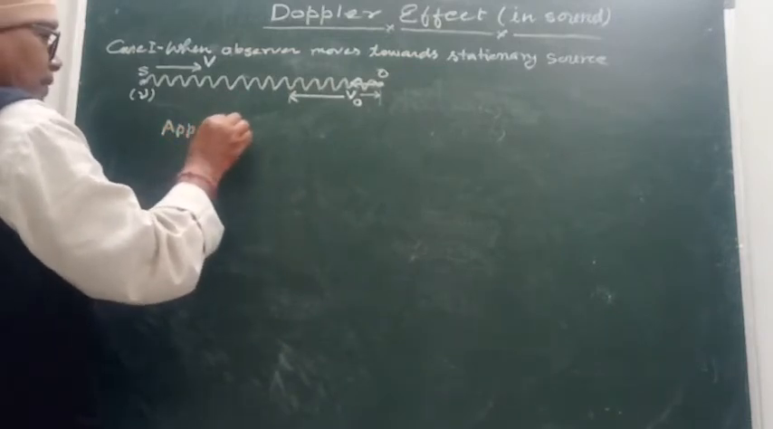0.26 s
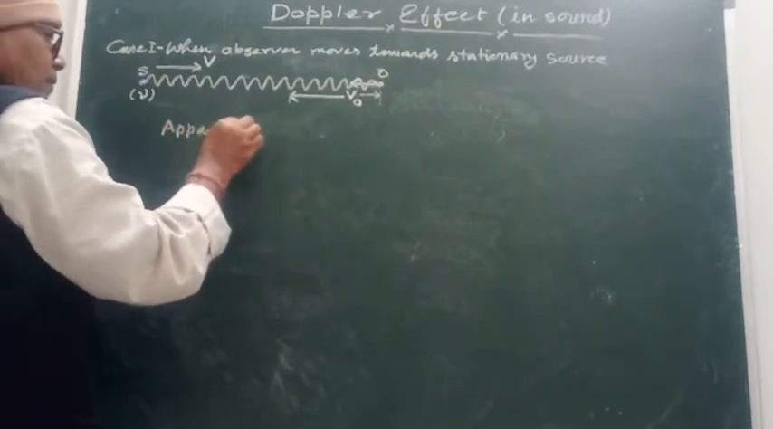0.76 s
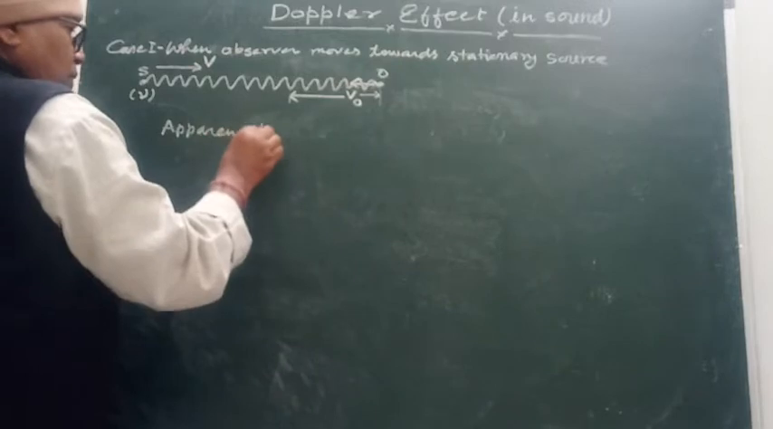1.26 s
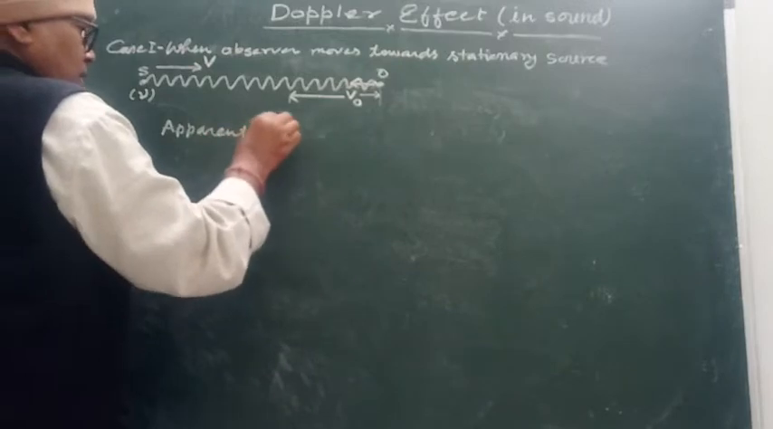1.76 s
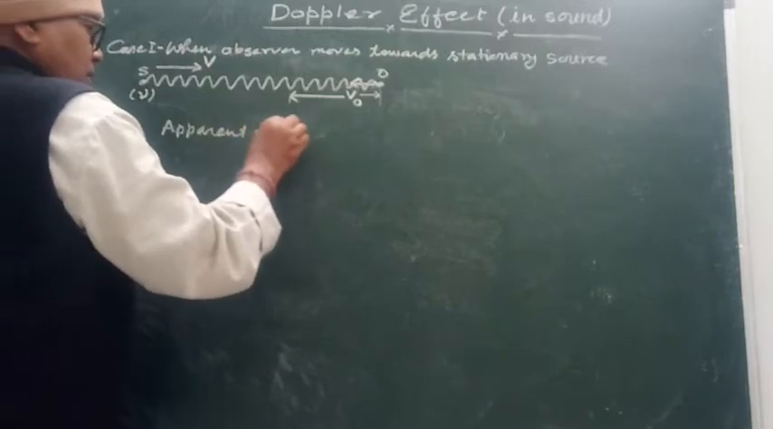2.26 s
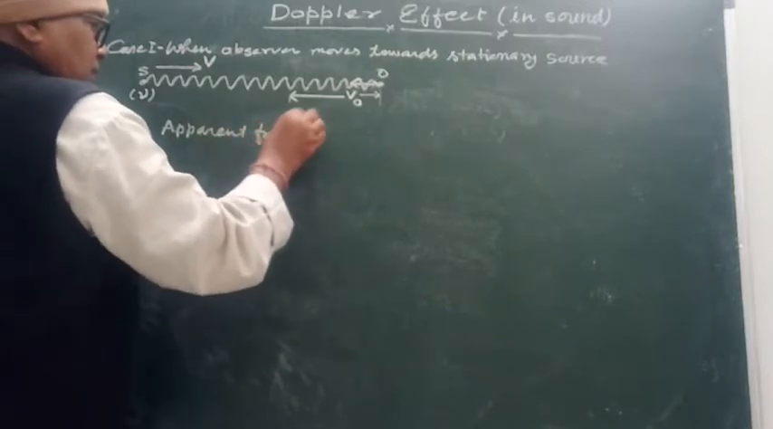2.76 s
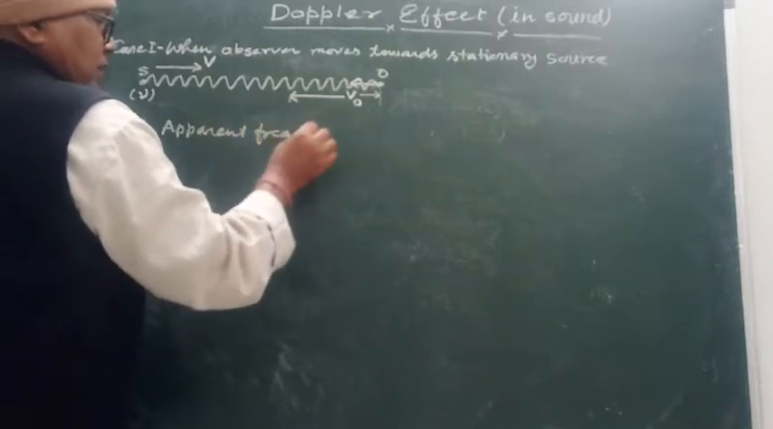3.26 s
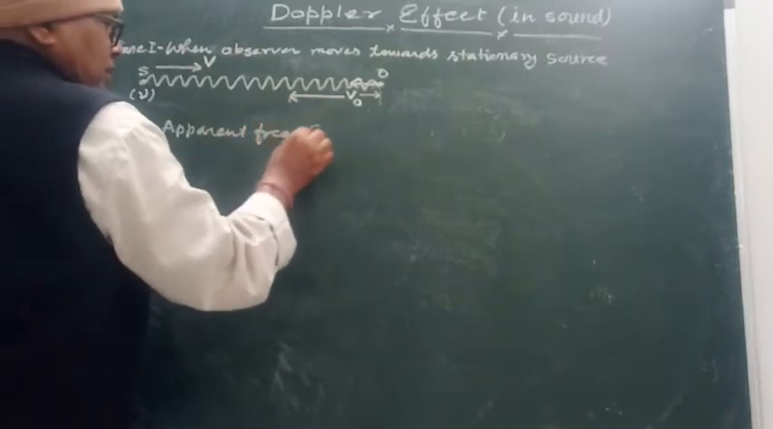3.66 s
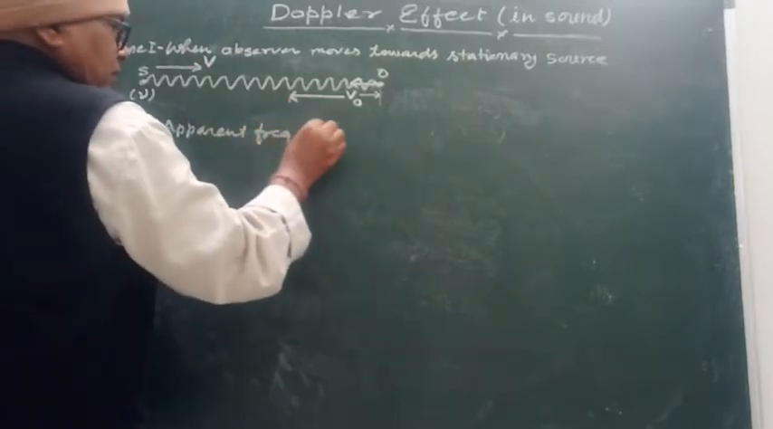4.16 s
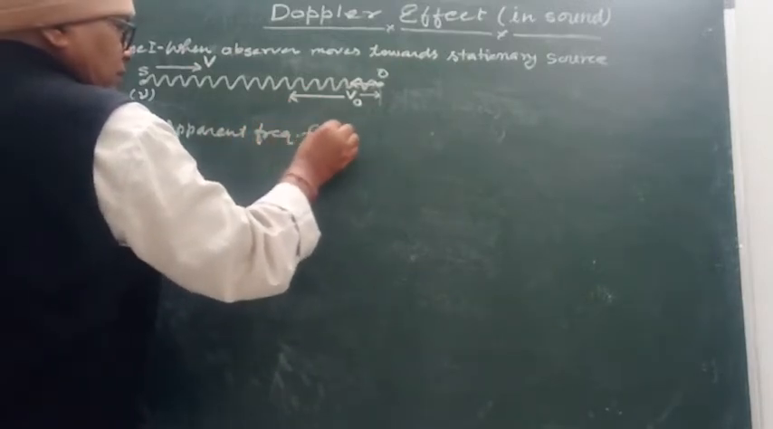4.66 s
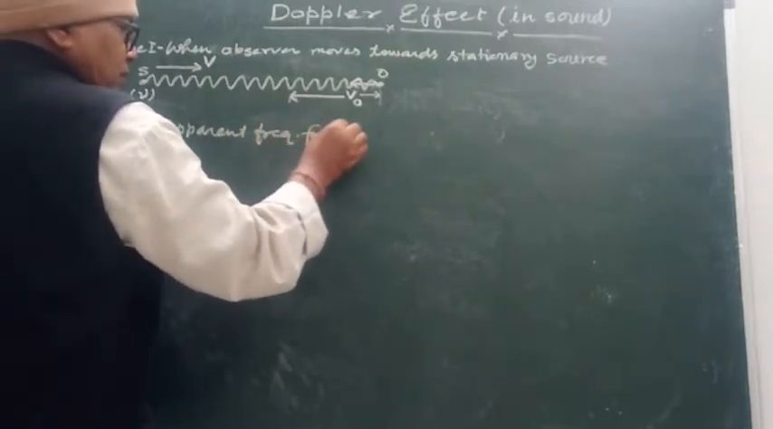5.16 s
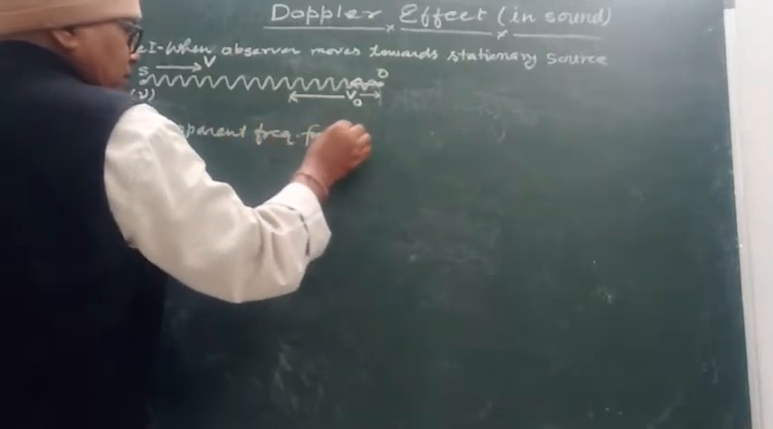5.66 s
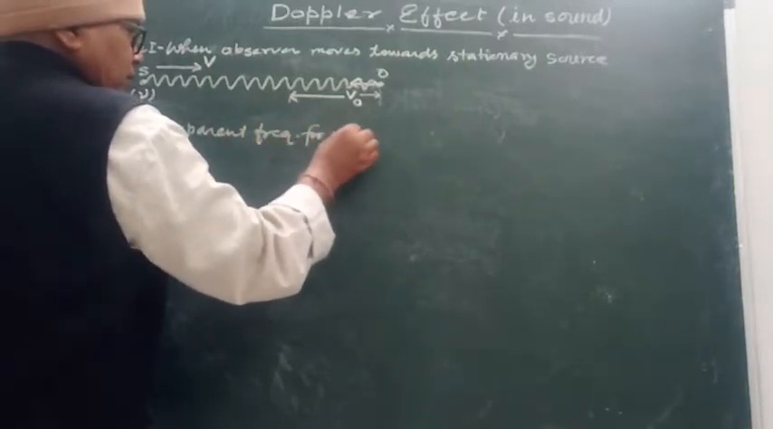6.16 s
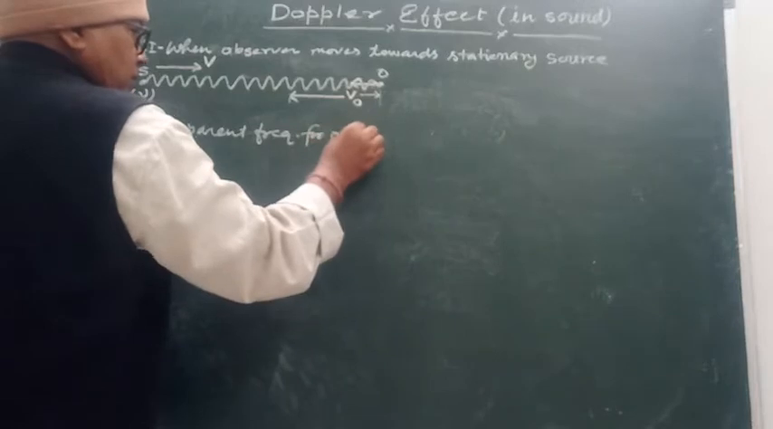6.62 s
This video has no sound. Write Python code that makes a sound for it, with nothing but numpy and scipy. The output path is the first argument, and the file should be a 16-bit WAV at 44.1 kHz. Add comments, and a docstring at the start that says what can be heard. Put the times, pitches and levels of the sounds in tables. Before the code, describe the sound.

Irregular sharp chalk knocks and short gritty strokes on a large wall board, with hollow room reverberation and a very quiet background.

```python
"""Taps and short scratches of chalk writing a few words on a wall blackboard in a bare, echoing classroom.
Each contact rings the board's modes and the chalk stick, runs back from the panel's edges and swings the panel.
Each drag is a train of crumbling grains: they hiss, rasp in the board's modes and sustain its resonances.
One crumb cracks with a tiny tick. Filtered noise makes the still air, a wavering sine the faint hum."""
import sys
import numpy as np
from scipy import signal
from scipy.fft import rfft, irfft, next_fast_len
from scipy.io import wavfile
from scipy.ndimage import uniform_filter1d

SR = 44100
rng = np.random.default_rng(int(sys.argv[2]) if len(sys.argv) > 2 else 0)


def wav_record(signal):
    """Record a signal, one row per channel, as 16-bit PCM in the file named by sys.argv[1]."""
    frames = np.transpose(np.atleast_2d(signal))
    bounded = np.clip(frames, -1, 1)
    # unit amplitude maps onto the largest positive 16-bit level
    quanta = np.round(bounded * 32767).astype(np.int16)
    wavfile.write(sys.argv[1], SR, quanta)


N = 303893
TIME_S = np.arange(N) / SR

# Chalk drags. Each row: start in seconds, length in seconds, share spent gathering speed (0-1), hiss of the tip
# in dB, rasp of its bite in dB before trim, panel drone in dB, pitch of the bite in Hz, pitch of the stick in Hz.
STROKES = [(-0.01, 0.17, 0.81, -48, -40.5, -46, 2000, 8250), (0.186, 0.098, 0.6, -53, -51, -52, 2470, 9000),
           (0.312, 0.082, 0.65, -53, -45, -49, 2000, 5950),
           (0.445, 0.16, 0.64, -51, -46, -48.5, 2050, 5800),
           (0.555, 0.095, 0.64, -47, -32, -40.5, 1150, 5940),
           (0.68, 0.16, 0.43, -48, -47, -46.5, 2600, 8800),
           (0.947, 0.04, .55, -45.5, -39.5, -39, 1870, 6300), (1.183, 0.17, 0.3, -46, -43, -37, 2300, 7760),
           (1.369, 0.11, 0.51, -46.5, -34.5, -33.5, 1070, 5900),
           (1.485, 0.18, 0.43, -47, -42.5, -42.5, 1000, 7300),
           (1.70, 0.15, 0.63, -46.5, -41.5, -45.5, 2210, 8300),
           (1.9, 0.19, 0.35, -55, -56, -46, 2420, 8260),
           (2.031, 0.15, 0.49, -46.5, -42.5, -45.5, 2200, 6950),
           (2.174, 0.14, 0.65, -50, -46.5, -38, 2470, 8900),
           (2.329, 0.083, 0.42, -47.5, -44.5, -42.5, 2540, 7200),
           (2.437, 0.15, 0.37, -48.5, -48.5, -42, 810, 8200),
           (2.588, 0.045, 0.84, -45, -42.5, -42.5, 1930, 6400),
           (2.78, 0.038, 0.54, -50, -34.5, -49, 2220, 5500),
           (3.542, 0.22, 0.64, -47, -50, -44.5, 1810, 8000),
           (3.862, 0.11, 0.35, -46.5, -42, -42, 845, 6060), (3.987, 0.14, 0.47, -56.5, -55, -48, 862, 7500),
           (4.13, 0.094, 0.49, -54.5, -44, -41, 1250, 5960),
           (4.217, 0.11, 0.46, -53, -50, -42.5, 850, 6060), (4.336, 0.073, 0.4, -60, -49.5, -40, 850, 6100),
           (4.389, 0.079, 0.92, -52.5, -44.5, -41.5, 2670, 5760),
           (4.68, 0.21, 0.32, -53, -52, -41.5, 870, 7000), (4.854, .15, 0.72, -51, -42, -44.5, 1460, 6900),
           (5.174, .14, .58, -50.5, -47, -43, 3070, 7050), (5.328, 0.023, 0.7, -54, -45, -47, 1830, 7150),
           (5.687, 0.12, 0.26, -61.5, -51, -48.5, 2940, 5700),
           (5.767, 0.11, 1, -52, -51.5, -46.5, 2500, 6950), (5.873, 0.077, 0.56, -59, -46, -42, 1990, 7800),
           (6.043, 0.072, 0.37, -54.5, -47, -38, 3000, 7050),
           (6.115, 0.12, 0.4, -55, -48.5, -44, 840, 7000),
           (6.228, 0.081, 0.58, -57.5, -49, -44.5, 2770, 6920),
           (6.448, 0.15, 0.8, -62, -51, -42.5, 2690, 6650),
           (6.566, 0.14, 0.65, -58.5, -50, -43.5, 830, 6910),
           (6.686, 0.19, 0.48, -54.5, -49, -41.5, 846, 6560),
           (6.756, 0.099, 0.68, -61, -42.5, -43, 1500, 6460)]
# Chalk contacts: taps, soft bumps and lift-off flicks. Each row: start in seconds, blow in dB, contact cut-off
# in Hz, low modes at that spot in dB, tick of the tip in dB, panel thump in dB before trim.
CONTACTS = [(0.927, 6, 3260, 2.5, -12, -37), (1.0938, -5, 1270, 1, -34, -38.5),
            (1.1624, 8.5, 2970, -3.5, -19.5, -33.5), (1.837, -11.5, 3000, -14, -14, -70),
            (2.627, -11.5, 2090, -5, -25, -63), (2.716, -12, 1700, 5.5, -31, -39.5),
            (2.7503, 9, 3800, -0.5, -10, -38.5), (2.925, -6, 1630, 5, -24, -32),
            (3.064, -11.5, 1150, 2.5, -42, -39.5), (3.4983, 3, 2820, -2.5, -17, -40.5),
            (3.86, -4.5, 1520, 4.5, -9, -40.5), (4.6754, 1.5, 3570, 6, -7.5, -35.5),
            (5.15, 5, 4760, 1, -6, -36.5), (5.6225, -7, 1710, 3.5, -41, -52),
            (6.0198, -6, 1500, 6.5, -21, -39), (6.4114, 0.3, 2900, 4.5, -22, -40.5)]
# Board modes. Each row: frequency in Hz, level in dB before changes by spot, t60 in seconds.
BOARD_MODES = [(243.0, -38, 0.0071), (318.6, -24, 0.095), (328, -35.5, 0.044), (403.7, -29.5, 0.059),
               (520, -35.5, 0.084), (622.5, -38, 0.17), (744.4, -39.5, 0.16), (863, -18.5, 0.0096),
               (1035, -40, 0.088), (1063, -36, 0.12), (1346, -21, 0.026), (1391, -23, 0.032),
               (1762, -20.5, 0.016), (1912, -26.5, 0.027), (2380, -16, 0.0073), (2444, -17.5, 0.0089),
               (3100, -19, 0.0028), (3230, -29, 0.023), (4180, -21, 0.0027), (4170, -33, 0.014),
               (7107.0, -51, 0.0018), (8245.0, -42, 0.0018)]
# Slow flexing of the whole panel. Each row: frequency in Hz, level in dB, both before random spread, t60 in seconds.
PANEL_FLEX = [(61.6, -16, 0.54), (96.2, -5.5, 0.73), (117, -2.5, 0.25), (141.6, -12, 0.98), (169, -8, 0.26),
              (193.8, -1, 0.36), (244.8, -11, 0.57)]
# Resonances that strokes sustain. Each row: frequency in Hz, width in Hz, level in dB.
DRONE_RESONANCES = [(129.5, 13, -18.5), (322.8, 18, 1.5), (416, 38, -8)]
# Ring of the chalk stick at a contact. One row: frequency in Hz, width in Hz, level in dB.
STICK_RING = (7700, 980, -7.5)
# Colour of crumbling chalk. Each row: frequency in Hz, density in dB per Hz.
HISS_COLOUR = [(2500, 0), (2950, 0.5), (3400, 0), (3750, 0.5), (4200, -1), (4900, -5), (5400, -1.5),
               (6100, 0), (6650, 0.5), (7200, -1), (8200, -1), (9100, -1.5), (10200, -7.5), (13000, -9),
               (14300, -10), (15500, -20)]
# Colour of the drag force on the board. Each row: frequency in Hz, gain in dB.
DRAG_COLOUR = [(200, -21), (450, 3.5), (800, 4.5), (1300, 1.5), (2100, 6), (4000, 0.5), (6000, 1),
               (12000, -29)]
# Room decay. Each row: frequency in Hz, t60 in seconds.
ROOM_T60 = [(100, 0.85), (400, 1.0), (1000, 1.4), (2500, 1.1), (5000, 0.9), (9000, 0.7), (15000, 0.4)]
# Room tail colour. Each row: frequency in Hz, level in dB.
ROOM_COLOUR = [(60, 17.5), (300, -1), (600, -2), (1500, -7), (3200, 0.5), (6000, -4), (14000, -11)]
# Still air of the room. Each row: frequency in Hz, density in dB per Hz.
AIR_COLOUR = [(15, -37), (25, 11.5), (68, -19), (99, -5.5), (313, -7.5), (848, -19.5), (2300, -21),
              (2560, -20.5), (4380, -29), (4750, -27), (5140, -27), (7300, -25.5), (15500, -33.5)]

AIR_DB = -54
HUM_HZ, HUM_DB = 326, -71
CUTOFF_HZ = 15750
# Tilt of the stick along a stroke: spread as a share of its pitch, changes per second.
STICK_WANDER_SHARE, TILTS_PER_S = 0.035, 25
# A firmer grip scratches louder and bites higher: spread as a share of the pitch, changes per second.
BITE_WANDER_SHARE, GRIPS_PER_S = 0.06, 55
LOW_MODES_HZ = 450  # modes below this depend most on where the chalk touches
BENDING_HZ = 2000  # pitch at which bending-wave travel times are given
SNAP_S = 0.148


def writing(rasp_trim_db=-1.0, catch_db=1.0, grip_db=0.9,
            stick_width_hz=700, stick_db=-2.0, bite_width_hz=480, bite_db=-1.0):
    """The dragged tip catches and slips; its grains hiss, ring the stick and shake the board."""
    friction = grains(per_s=7000, spread_db=2.0) * from_db(catch_db * drift(per_s=170))
    crumbs = grains(per_s=11000, spread_db=3.7) * from_db(1.3 * drift(per_s=220))
    hiss = colour(crumbs, HISS_COLOUR)
    rasp = colour(signal.oaconvolve(friction, board_response())[:N], DRAG_COLOUR)
    drone = panel_drone(friction)

    tilt = 1 + STICK_WANDER_SHARE * drift(per_s=TILTS_PER_S)
    grip = drift(per_s=GRIPS_PER_S)
    out = np.zeros(N)
    for start_s, length_s, rise_share, stroke_hiss_db, stroke_rasp_db, drone_db, bite_hz, stick_hz in STROKES:
        rise_s, fall_s = rise_share * length_s, (1 - rise_share) * length_s
        fastest_s = start_s + rise_s
        span = slice(max(int((fastest_s - 1 / 4) * SR), 0), int((fastest_s + 1 / 4) * SR))
        bright = stressed(hiss[span], stick_hz * tilt[span], stick_width_hz, stick_db)
        moving_bite_hz = bite_hz * (1 + BITE_WANDER_SHARE * grip[span])
        bite = stressed(rasp[span], moving_bite_hz, bite_width_hz, bite_db)
        scratch = from_db(stroke_hiss_db) * bright + from_db(stroke_rasp_db + rasp_trim_db) * bite
        scratch = scratch * from_db(grip_db * grip[span])
        sound = hand_echo(scratch, share=0.46) + from_db(drone_db) * drone[span]
        out[span] += sound * stroke_shape(TIME_S[span] - fastest_s, rise_s, fall_s)
    return out


def grains(per_s, spread_db):
    """Chalk crumbs break off at random moments, with very unequal sizes and either sign."""
    sizes = from_db(spread_db * np.minimum(rng.exponential(1, N), 5))
    signs = rng.choice([-1, 1], N)
    return sizes * signs * (rng.random(N) < per_s / SR)


def panel_drone(friction):
    """Friction sustains the panel's resonances; steady pressure keeps the swing even."""
    swing = sum(from_db(db) * resonate(friction, hz, width_hz) for hz, width_hz, db in DRONE_RESONANCES)
    drone = rms_one(butter(swing, 750, "low"))
    return drone / np.sqrt(uniform_filter1d(drone ** 2, size=2000) + 0.11)


def stressed(x, hz, width_hz, db):
    """Lift a noise around a moving resonance; rms 1."""
    return rms_one(x + from_db(db) * gliding_ring(x, hz, width_hz))


def gliding_ring(x, hz, width_hz):
    """Resonance with a moving centre: shift it to 0 Hz, low-pass, shift back; gain 1 on top."""
    r = np.exp(-np.pi * width_hz / SR)
    turn = np.exp(2j * np.pi * np.cumsum(hz) / SR)
    return 2 * np.real(turn * signal.lfilter([1 - r], [1, -r], x / turn))


def hand_echo(x, share, nearest_s=0.00059, farthest_s=0.001948, slide=0.062):
    """The hand reflects the tip's sound over a short, slowly changing path, which combs its spectrum."""
    n = np.arange(len(x))
    lag = rng.uniform(nearest_s, farthest_s) * SR  # samples
    moving_lag = lag * np.linspace(1, 1 + slide * rng.standard_normal(), len(x))
    return (x + share * np.interp(n - moving_lag, n, x)) / np.hypot(1, share)


def stroke_shape(t_s, rise_s, fall_s, edge_db=-12.0, bow=1.87, release_s=0.0061):
    """Loudness follows the speed of the tip; outside the stroke it dies quickly."""
    slowness = np.interp(t_s, [-rise_s, 0, fall_s], [1, 0, 1])
    outside_s = np.maximum(np.maximum(-rise_s - t_s, t_s - fall_s), 0)
    return from_db(edge_db * slowness ** bow) * np.exp(-outside_s / release_s)


def contacts(thump_trim_db=0.5, swell_s=0.012, crush_hz=8700, tick_hz=4800, modes_db=-1.5, uneven_db=3.0):
    """Each has its own loudness and contact cut-off; the panel swings later. Returns direct sound, room feed."""
    direct, feed = np.zeros(N), np.zeros(N)
    stick_hz, stick_width_hz, stick_db = STICK_RING
    for start_s, blow_db, contact_hz, body_db, tick_db, flex_db in CONTACTS:
        # modes_db is taken off the low modes here, so body_db alone shifts them
        board = board_response(unlike_db=1.8, detune=0.014, body_db=body_db - modes_db)
        response = from_db(modes_db) * board
        response = response + edge_returns(len(response))
        impulse = signal.unit_impulse(len(response))
        response = response + from_db(stick_db) * resonate(impulse, stick_hz, stick_width_hz)
        response = signal.fftconvolve(response, crumbling(seconds=1 / 25))
        # the crumbling tip adds a tick of its own, with a softened top
        tick = butter(butter(response, tick_hz, "high"), crush_hz, "low", order=4)
        blow = butter(response, contact_hz, "low", order=3)
        knock = from_db(blow_db) * (blow - from_db(tick_db) * tick)
        add(direct, start_s, knock)
        add(direct, start_s, from_db(flex_db + thump_trim_db) * panel_thump(swell_s, uneven_db))
        spread = all_round(knock)
        add(feed, start_s - len(spread) / (2 * SR), spread)
    return direct, feed


def panel_thump(swell_s, uneven_db):
    """The whole panel flexes slowly; each contact spreads its modes' pitch and level, and the swing swells in."""
    modes = [(hz * rng.normal(1, 0.019), db + uneven_db * rng.standard_normal(), t60_s)
             for hz, db, t60_s in PANEL_FLEX]
    flex = ringing(modes, seconds=1)
    return flex * (1 - np.exp(-(TIME_S[:len(flex)] / swell_s) ** 2))


def board_response(unlike_db=0.0, detune=0.0, click=0.59, body_db=0):
    """The board's answer to a point blow; each spot can weight and shift the modes a little."""
    chance = rng.standard_normal((len(BOARD_MODES), 2))
    modes = []
    for (hz, db, t60_s), (shift, weight) in zip(BOARD_MODES, chance):
        spot_db = db + unlike_db * weight + body_db * (hz < LOW_MODES_HZ)
        modes.append((hz * (1 + detune * shift), spot_db, t60_s))
    response = ringing(modes, seconds=1 / 4)
    response[0] += click
    return response


def edge_returns(size, count=22, first_s=0.0014, last_s=0.03, first_db=-5.0, later_db=-4.5, fade_s=0.013,
                 low_hz=600, high_hz=1900):
    """Bending waves return from the panel's edges and fixings at uneven times, treble ahead of bass."""
    hz = np.fft.rfftfreq(size, 1 / SR)
    delays_s = np.geomspace(first_s, last_s, count) * np.r_[1, rng.uniform(1, 1.5, count - 1)]
    gains = np.r_[from_db(first_db), from_db(later_db) * rng.choice([-1, 1], count - 1)]
    gains = gains * np.exp(-delays_s / fade_s)
    phase_per_s = 4 * np.pi * np.sqrt(hz * BENDING_HZ)  # delay falls as 1 / sqrt(hz)
    spectrum = sum(gain * np.exp(-1j * phase_per_s * delay_s) for gain, delay_s in zip(gains, delays_s))
    return butter(butter(irfft(spectrum, size), low_hz, "high"), high_hz, "low")


def crumbling(seconds, crush_db=-1.0, crush_s=0.00048, scatter_db=-12.5, scatter_s=0.034, crunch_hz=3800):
    """One blow, a brief bright crunch as the tip gives way, and a faint scatter of crumbs."""
    t_s = TIME_S[:int(seconds * SR)]
    force = 0
    for db, life_s in ((crush_db, crush_s), (scatter_db, scatter_s)):
        burst = rng.standard_normal(len(t_s)) * np.exp(-t_s / life_s)
        force = force + from_db(db) * burst * np.sqrt(2 / (life_s * SR))  # evens out the two lives
    return butter(force, crunch_hz, "high", order=4) + signal.unit_impulse(len(t_s))


def all_round(knock, blur=0.17):
    """Panel radiation varies with direction; the room gets a mean, smoothed spectrum as a centred pulse."""
    energy = np.cumsum(np.abs(rfft(knock)) ** 2)
    bins = np.arange(len(energy))
    reach = 1 + blur * bins
    power = np.interp(bins + reach, bins, energy) - np.interp(bins - reach, bins, energy)
    power = power / (2 * reach)
    return np.fft.fftshift(irfft(np.sqrt(np.maximum(power, 0))))


def crumb_snap(snap_db=-37.0, life_s=0.0007, low_hz=6000):
    """A single hard crumb cracks under the tip: a tiny, bright, decaying noise burst."""
    out, t_s = np.zeros(N), TIME_S[:SR // 50]
    burst = rng.standard_normal(len(t_s)) * np.exp(-t_s / life_s)
    add(out, SNAP_S, from_db(snap_db) * butter(burst, low_hz, "high", order=4))
    return out


def classroom_response(first_wall_s=0.019, build_s=0.008):
    """Echoes thicken once the far walls answer, then decay at a rate set per band."""
    t_s = TIME_S[:3 * SR // 2]
    white = rng.standard_normal((2, len(t_s)))
    edges_hz = np.geomspace(45, 16000, 15)
    tail = 0
    for k, (low_hz, high_hz) in enumerate(zip(edges_hz, edges_hz[1:])):
        hz = np.sqrt(low_hz * high_hz)
        fade = np.exp(-np.log(1000) * t_s / at_hz(ROOM_T60, hz))
        band = butter(white[k % 2], [low_hz, high_hz], "band")  # neighbouring bands use separate noises
        tail = tail + from_db(at_hz(ROOM_COLOUR, hz)) * band * fade
    build = 1 - np.exp(-np.maximum(t_s - first_wall_s, 0) / build_s)
    return tail * build / np.sqrt(SR / 10)


def background(waver_db=12.0):
    """Still air is coloured noise; the faint hum is a sine of wavering level."""
    hum_level = from_db(HUM_DB + waver_db * drift(per_s=3.16))
    hum = np.sqrt(2) * np.sin(2 * np.pi * HUM_HZ * TIME_S) * hum_level
    return hum + from_db(AIR_DB) * colour(rng.standard_normal(N), AIR_COLOUR)


def ringing(modes, seconds):
    """Sum of decaying modes; neighbours swing in opposite directions."""
    t_s = np.arange(int(seconds * SR)) / SR
    out = 0
    for k, (hz, db, t60_s) in enumerate(modes):
        decay = np.exp(-np.log(1000) * t_s / t60_s)
        out = out + (-1) ** k * from_db(db) * decay * np.sin(2 * np.pi * hz * t_s)
    return out


def resonate(x, hz, width_hz):
    """One two-pole resonance with gain 1 on top."""
    r = np.exp(-np.pi * width_hz / SR)
    zeros = np.array([1, 0, -1]) * (1 - r * r) / 2
    return signal.lfilter(zeros, [1, -2 * r * np.cos(2 * np.pi * hz / SR), r * r], x)


def drift(per_s):
    """Random level of rms 1: straight lines between per_s chance values a second."""
    return rms_one(np.interp(TIME_S * per_s, np.arange(8192), rng.standard_normal(8192)))


def colour(x, spectrum):
    """Filter a sound by a spectrum table; rms 1."""
    size = next_fast_len(N)
    gain = from_db(at_hz(spectrum, np.fft.rfftfreq(size, 1 / SR)))
    return rms_one(irfft(rfft(x, size) * gain, size)[:N])


def at_hz(points, hz):
    """Read a table on a log-frequency axis."""
    table = np.array(points)
    return np.interp(np.log(np.maximum(hz, 1)), np.log(table[:, 0]), table[:, 1])


def butter(x, hz, kind, order=2):
    """Causal Butterworth filter."""
    return signal.sosfilt(signal.butter(order, hz, kind, fs=SR, output="sos"), x)


def from_db(db):
    """Decibels to gain."""
    return 10 ** (np.asarray(db) / 20)


def rms_one(x):
    """Scale to rms 1."""
    return x / np.sqrt(np.mean(x ** 2) + 1e-20)


def add(track, start_s, sound):
    """Mix a sound into a track at a time."""
    at = max(round(start_s * SR), 0)
    track[at:at + len(sound)] += sound[:N - at]


def scene(contact_room_db=-4.5, stroke_room_db=-7.0):
    """Strokes and contacts, heard directly and through the classroom, over the background."""
    strokes = writing()
    knocks, knock_feed = contacts()
    feed = from_db(contact_room_db) * knock_feed + from_db(stroke_room_db) * strokes
    echo = signal.fftconvolve(feed, classroom_response())[:N]
    return (strokes + knocks + crumb_snap() + echo + background())[None]


def record(dry):
    """The microphone loses the deepest bass; the top is cut steeply."""
    thin = butter(dry, 62, "high")
    return signal.sosfilt(signal.ellip(10, .1, 70, CUTOFF_HZ, fs=SR, output="sos"), thin)


dry = scene()
out = record(dry)
wav_record(out)
```